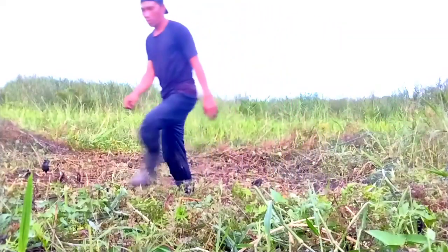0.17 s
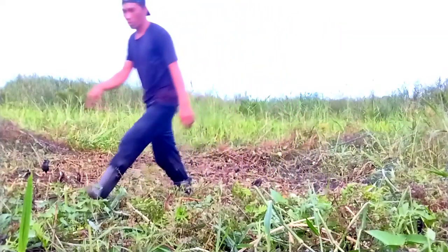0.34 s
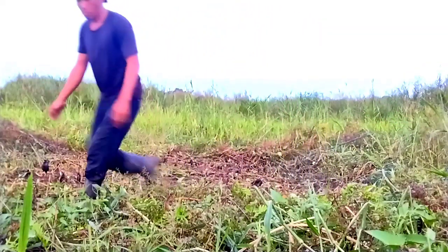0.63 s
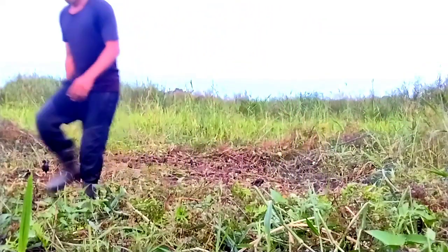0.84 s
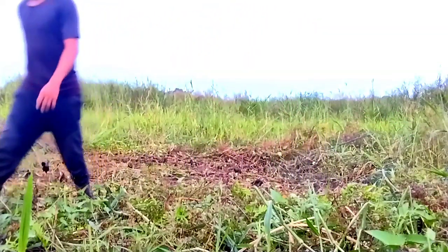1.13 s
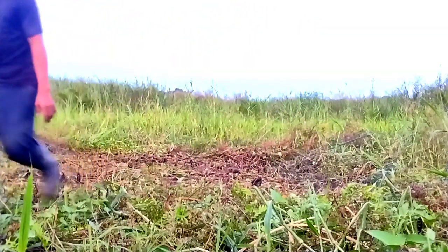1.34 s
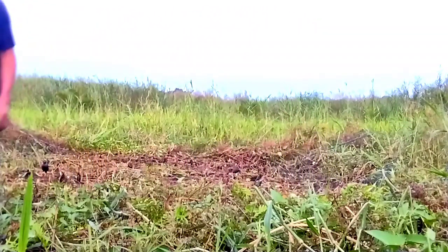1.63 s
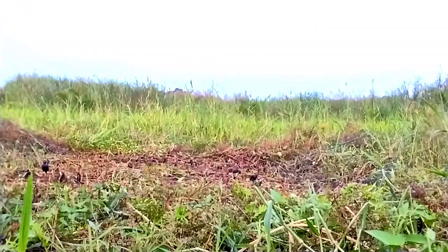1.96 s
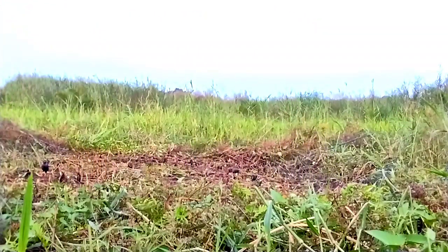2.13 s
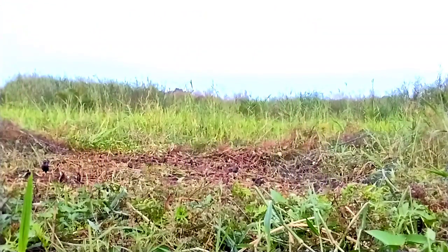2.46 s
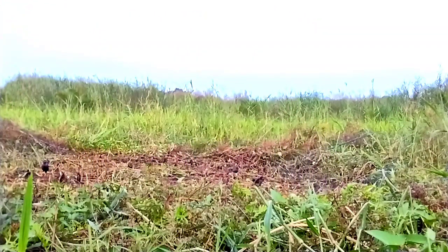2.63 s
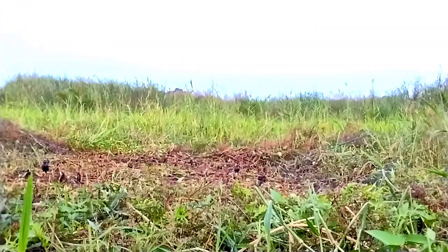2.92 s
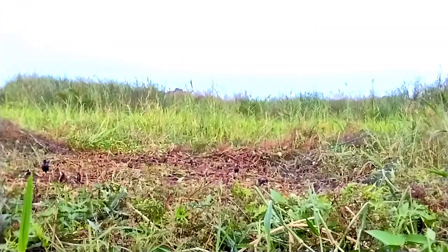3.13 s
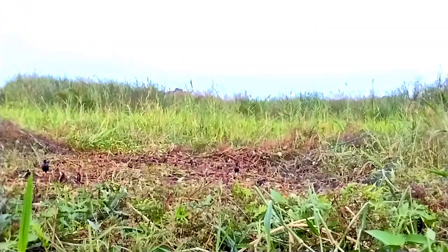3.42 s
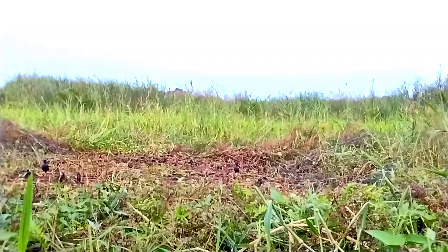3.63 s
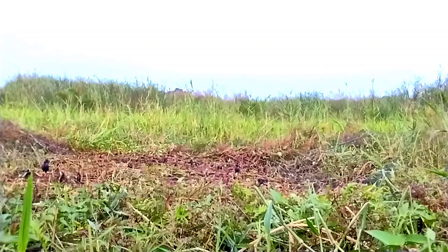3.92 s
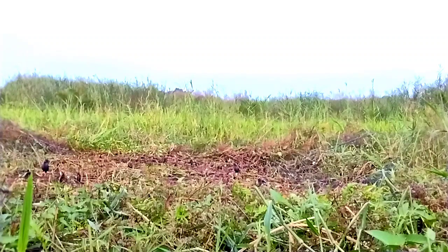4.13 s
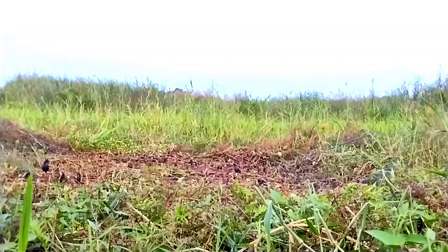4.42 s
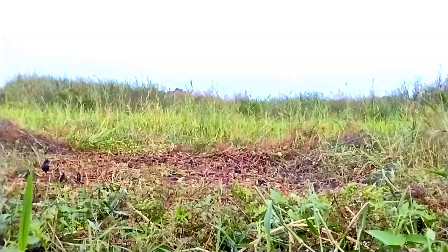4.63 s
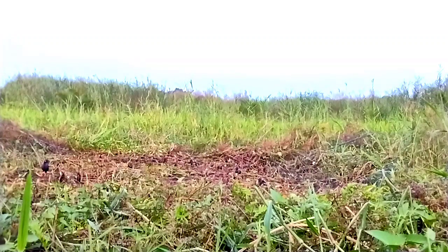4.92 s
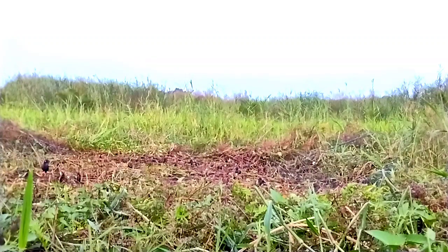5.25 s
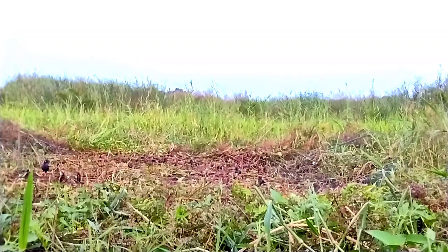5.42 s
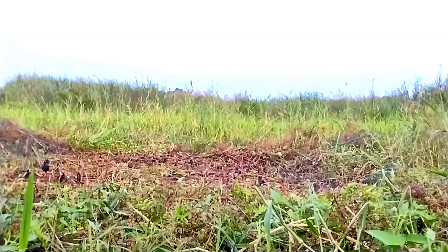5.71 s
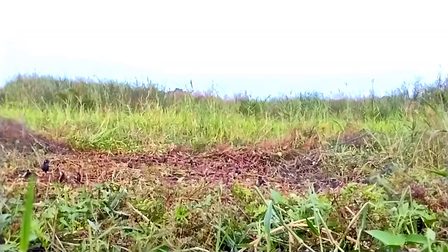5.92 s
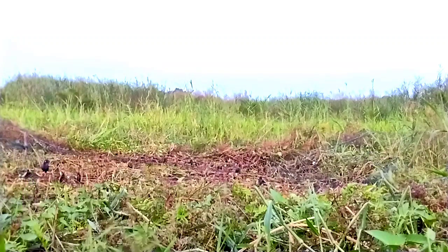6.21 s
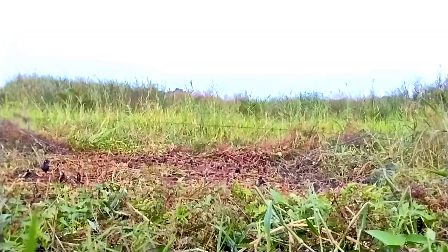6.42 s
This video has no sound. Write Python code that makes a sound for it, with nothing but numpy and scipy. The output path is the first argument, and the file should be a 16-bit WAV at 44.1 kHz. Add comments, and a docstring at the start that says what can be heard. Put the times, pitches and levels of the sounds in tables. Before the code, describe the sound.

An open field with a faint far rumble and a thin steady insect hiss near 8 kHz. From the start small birds chatter in hoarse, overlapping bursts a few times a second, mostly around 3 kHz, with brief clear chirps. Rising whistles that leap to a higher note come at 0, 1.0, 2.8, 4.0, 4.6, 4.75 and 6.1 s; an arched one sweeps up and down at 5.1 s. Thin falling peeps repeat from 4.6 to 5.4 s. Close by, boots squelch and thud softly in mud around 0.4, 1.1 and 1.7 s; a stem snaps sharply at 2.4 s. Wading thickens from 3.6 s, with pops at 4.3 s, dry ticks from 5.35 to 5.8 s, a short rasp at 5.7 s, and the strongest squelch, rustle and cracks at 5.9-6.15 s. Birds carry weak echoes; the small mono microphone suppresses quiet gaps.

```python
"""A grassy field with wet soil: a far rumble, a thin insect hiss near 8 kHz and a flock of small birds.
The birds are gliding near-sines: hoarse overlapping warbles for the chatter, single notes and whistles on top.
Someone wades through weeds nearby: ringing grains squelch, bright grains rustle, noise bursts snap like stems,
damped pops thud, and there are rasps and runs of dry ticks. Weak echoes follow the birds.
A small microphone with a noise suppressor picks it up in mono."""
import sys
import numpy as np
from scipy import signal
from scipy.fft import rfft, irfft
from scipy.io import wavfile
from scipy.ndimage import uniform_filter1d

SR = 44100
rng = np.random.default_rng(int(sys.argv[2]) if len(sys.argv) > 2 else 0)


def unload_audio(sound):
    """Save the sound as a 16-bit wav file, at the path given as the first command line argument."""
    columns = np.transpose(np.atleast_2d(sound))
    # keep every value between -1 and 1, then stretch to whole-number steps
    steps = np.round(np.clip(columns, -1, 1) * 32767)
    wavfile.write(sys.argv[1], SR, steps.astype(np.int16))


N = 290178   # length in samples

# All levels are set ahead of the suppressor and microphone.
# Far rumble and hiss, tone colour: (frequency [Hz], relative level [dB])
FIELD_COLOUR = [(20, -12), (85, -16), (125, 3.5), (250, -2), (500, -13.5), (1500, -25.5), (3000, -19),
                (5000, -29.5), (9500, -40.5), (12000, -43), (15700, -46)]
# Strides through the weeds: (peak time [s], build-up [s], dying time [s],
# squelch level before trim [dB], leaves level before trim [dB])
STRIDES = [(0.375, 0.046, 0.27, -50.5, -67), (.92, 0.03, 0.04, -49.5, -85), (1.086, 0.01, .14, -46.5, -65),
           (1.702, 0.035, 0.17, -51.5, -70), (2.482, .05, 0.039, -67, -64),
           (3.573, 0.011, 0.084, -37.5, -55), (3.64, .05, 0.29, -49, -60.5),
           (3.953, 0.15, 0.048, -69, -55.5), (4.365, 0.21, 0.24, -42.5, -54), (4.812, 0.19, 0.18, -51, -72),
           (4.95, 0.13, .15, -52, -57.5), (5.036, 0.28, 0.13, -47.5, -57.5),
           (5.55, 0.087, 0.11, -49.5, -63), (5.695, 0.014, 0.15, -41, -64), (5.989, 0.23, 0.26, -41, -40.5),
           (6.119, 0.064, 0.11, -31, -43), (6.58, 0.054, .05, -53, -54.5)]
# Faint stirring between strides: (time [s], squelch before trim [dB], leaves before trim [dB])
STIRRING = [(0, -65.5, -76), (1.3, -69, -79), (1.9, -66, -74), (2.6, -64, -75.5), (3.5, -67, -67),
            (5.4, -62, -67), (6.3, -59, -62.5), (6.58, -66.5, -83)]
# Filter laid over the ringing mud grains: (frequency [Hz], relative gain [dB])
SQUELCH_COLOUR = [(40, -62), (80, -42), (200, -5), (350, -0.5), (650, 0.5), (1200, -3), (2200, -5),
                  (5000, -23)]
# Filter laid over the brushing leaf grains: (frequency [Hz], relative gain [dB])
LEAF_COLOUR = [(60, -25), (300, 9), (1500, 11), (3000, 13), (5500, 6.5), (9000, 5.5), (12000, -3.5),
               (15500, 11.5)]
# Breaking stems: (time [s], peak level [dB])
STEM_SNAPS = [(0.3516, -49), (1.0834, -43), (1.2026, -35.5), (1.273, -38), (1.6944, -37), (1.9707, -41.5),
              (2.4436, -10.5), (3.573, -36), (3.687, -36), (3.9498, -32), (4.0894, -39), (4.169, -36),
              (4.263, -33), (4.362, -35), (4.9354, -52), (5.1199, -51), (5.8203, -37), (5.936, -21.5),
              (6.0496, -21), (6.4184, -45)]
# Boots in mud: (time [s], drive level [dB], pitch of the first pop [Hz])
BOOT_THUDS = [(0.362, -36, 453), (0.538, -36.5, 404), (0.912, -41, 990), (1.081, -23, 600),
              (1.684, -37.5, 625), (2.182, -41.5, 404), (3.578, -22.5, 594), (3.663, -37.5, 674),
              (4.262, -32.5, 625), (4.306, -24, 567), (4.364, -29.5, 915), (5.047, -32, 780),
              (5.925, -30, 433), (5.999, -31, 601), (6.126, -20.5, 641)]
# Runs of dry even ticks: (start [s], end [s], period [ms], drive level before the band-pass [dB])
TICK_RUNS = [(5.349, 5.399, 23, -36), (5.464, 5.548, 20.5, -37), (5.715, 5.804, 20.7, -41)]
# A boot drags through coarse stems: (time [s], length [ms], opening level [dB], band centre, roughly [Hz])
BOOT_RASPS = [(3.568, 25, -41.5, 1270), (5.688, 60, -42, 1740)]
# Bursts of rough chatter: (time [s], length [s], opening level [dB], closing level [dB])
CHATTER_BURSTS = [(0.0, 0.051, -45.5, -53), (0.058, 0.16, -49.5, -48.5), (0.327, 0.15, -40, -51),
                  (0.528, 0.19, -50, -51.5), (0.827, 0.2, -49.5, -47.5), (1.013, .19, -48.5, -50),
                  (1.296, 0.1, -48.5, -45), (1.5, 0.14, -58.5, -54), (1.624, 0.21, -49.5, -42.5),
                  (1.93, 0.065, -57.5, -59), (1.98, 0.2, -48.5, -56), (2.164, 0.16, -49.5, -56.5),
                  (2.376, 0.21, -47.5, -51), (2.679, .12, -44.5, -48.5), (2.794, 0.068, -43.5, -50),
                  (2.93, 0.032, -56, -55), (3.063, 0.14, -47, -47), (3.277, 0.21, -44.5, -57.5),
                  (3.474, 0.12, -44.5, -44), (3.65, .17, -43, -50.5), (3.914, 0.23, -46.5, -41.5),
                  (4.153, 0.12, -42.5, -46), (4.328, .155, -47, -48.5), (4.517, .14, -42.5, -53),
                  (4.695, .16, -44, -51.5), (4.899, 0.19, -48.5, -47), (5.104, 0.22, -46, -50),
                  (5.282, 0.13, -46, -48.5), (5.465, 0.16, -46, -49), (5.745, 0.094, -49.5, -48),
                  (5.955, 0.25, -47.5, -37.5), (6.231, 0.1, -41, -50.5), (6.382, 0.083, -50.5, -49),
                  (6.531, .05, -54, -48)]
# Swing of the chatter's register; only its ratio to the mean counts: (time [s], frequency [Hz])
FLOCK_REGISTER = [(0, 3353), (1.2, 2952), (1.3, 3749), (2.1, 3398), (2.8, 2951), (3.7, 3050), (4.0, 3503),
                  (4.48, 3600), (4.56, 2951), (5.6, 3395), (5.75, 2900), (6.05, 3599), (6.58, 3000)]
# Shrill group near 5.5 kHz: (time [s], level against the rest of the chatter [dB])
SHRILL_SHARE = [(0, -15), (.5, -14), (1.0, -10), (1.25, -33), (3.5, -21.5), (5.0, -32), (6.58, -17.5)]
# Overtones of a bird's voice, before each voice's trim and the treble fade: (multiple [x], level [dB])
VOICE_OVERTONES = [(2, -20.5), (3, -21.5), (4, -20)]
# Short clear notes: (time [s], length [ms], start pitch [Hz], end pitch [Hz], level [dB])
CLEAR_NOTES = [(0.077, 37, 3250, 3100, -48), (0.175, 52, 3470, 3870, -45), (0.319, 15, 3920, 3850, -48),
               (0.46, 27, 2480, 3030, -50.5), (0.597, 22, 3680, 3640, -49), (0.709, 39, 2760, 3130, -47),
               (0.74, 33, 2560, 2550, -54), (0.842, 34, 2610, 2600, -49.5), (0.905, 54, 3530, 3720, -50.5),
               (0.959, 20, 3190, 3020, -42), (0.969, 16, 3300, 3630, -39), (0.985, 24, 3060, 2800, -40.5),
               (1.005, 33, 2910, 3590, -40), (1.107, 26, 2680, 2600, -44), (1.21, 27, 3610, 3700, -51.5),
               (1.215, 35, 5300, 5320, -56), (1.285, 20, 4400, 4200, -52), (1.387, 36, 3940, 4030, -40),
               (1.403, 55, 2610, 2580, -51), (1.463, 52.5, 3850, 3560, -43), (1.518, 22, 2950, 2340, -46.5),
               (1.553, 29, 3250, 2160, -48), (1.583, 39, 3925, 3730, -40), (1.671, 23, 3600, 3800, -44),
               (1.783, 39, 3800, 3700, -41), (2.0, 35, 2370, 2800, -52.5), (2.1, 57, 3600, 3420, -54),
               (2.172, 23, 2740, 2910, -43), (2.222, 44, 2820, 3350, -41.5), (2.448, 28, 2710, 2850, -42.5),
               (2.561, 38, 2250, 2900, -52.5), (2.812, 39, 2825, 2650, -46.5), (2.828, 94, 3720, 3550, -45),
               (3.129, 29.4, 2570, 2790, -45), (3.218, 67, 3830, 3700, -56), (3.273, 21.4, 2850, 3100, -41),
               (3.326, 32, 3070, 3240, -45), (3.6, 35, 3550, 3500, -50.5), (3.705, 23, 2800, 2840, -41),
               (3.723, 23, 3310, 3340, -47.5), (3.829, 64, 3590, 3440, -51.5), (3.89, 36, 5200, 5260, -51),
               (4.07, 36, 3950, 3480, -37), (4.124, 56, 3500, 3740, -38), (4.212, 48, 3850, 3730, -44.5),
               (4.25, 46, 2205, 1930, -41), (4.266, 31, 3790, 3810, -37), (4.329, 22, 2650, 2640, -42),
               (4.353, 22, 3520, 3840, -39), (4.379, 17, 3730, 3640, -40), (4.473, 23.5, 3850, 3720, -38.5),
               (4.602, 29, 2430, 2916, -43), (4.7, 72, 1870, 1640, -55), (4.947, 40, 2600, 2900, -42.5),
               (5.003, 61, 3140, 3260, -44.5), (5.044, 25, 3030, 3010, -41), (5.125, 14, 5850, 5100, -54),
               (5.151, 34, 2900, 2800, -44.5), (5.205, 21, 6100, 5100, -60), (5.342, 39, 2840, 3320, -46),
               (5.416, 50, 3230, 3590, -51), (5.578, 50, 3450, 3910, -47), (6.178, 20, 2740, 3080, -42),
               (6.188, 46, 3050, 3790, -36.5), (6.255, 20, 2530, 2570, -43), (6.31, 49, 3710, 3570, -43.5),
               (6.421, 27, 3160, 3210, -43.5)]
# One bird repeats a thin falling note: (time [s], level [dB])
THIN_PEEPS = [(4.601, -56), (4.693, -58), (4.79, -58), (4.888, -56), (4.988, -51.5), (5.107, -49),
              (5.217, -54), (5.32, -53.5), (5.439, -55.5)]
# Rising whistles: (time [s]; lengths of opening, low note, leap, high note [ms];
# pitch at start, dip, low note, its sag, its end, high note [Hz];
# level [dB], opening and high note against it [dB], overtone trim [dB])
RISING_WHISTLES = [(0.005, 34.8, 68, 11, 48, 1847, 1830, 2080, 1900, 2194, 2867, -36.5, -15.5, 3.5, -7.5),
                   (1.025, 54.4, 73.2, 15, 42, 1900, 2050, 2240, 2180, 2370, 2986, -35, -24.5, -2.5, -11),
                   (2.806, 62.4, 62, 22, 29.2, 1618, 1155, 2040, 1830, 2130, 2787, -41, -14.5, -6, 9),
                   (3.996, 55, 49.1, 31, 30, 1837, 1638, 1990, 1980, 2090, 2900, -37.5, -14.5, -5, 0),
                   (4.641, 36.5, 63.9, 29, 41, 1910, 2037, 2300, 2226, 2196, 2910, -33, -19.5, -7.5, -22),
                   (4.745, 25, 54, 20, 44, 1790, 1730, 2030, 2020, 2160, 2806, -35.5, -21, -3.5, -4),
                   (6.110, 40, 47.9, 13, 55, 1890, 1920, 2000, 2040, 2167, 2840, -41.5, -2, 2, 5)]
# One whistle sweeps up and glides down: (time [s], pitch [Hz], level [dB])
ARCHED_WHISTLE = [(5.126, 2690, -48), (5.135, 2512, -44.5), (5.154, 3470, -38.5), (5.171, 3760, -42),
                  (5.193, 3560, -41), (5.228, 2400, -45.5), (5.247, 2310, -58)]
# Reflections off the ground and the bank: (delay [s], level [dB])
ECHO_TAPS = [(.011, -18), (.023, -22), (0.042, -20.5), (.067, -32)]

FIELD_DB = -57.5
INSECT_HZ, INSECT_WIDTH_HZ, INSECT_DB = 8100, 800, -60   # width is that of each of two resonators
STRIDE_RANGE_DB = 17.5   # fall over one build-up or dying time
SNAP_HZ = 4800
THUD_S = 0.037   # span over which the pops of a thud scatter
FLOCK_HZ = 3177
REGISTER_FOLLOWS = 0.6   # share of the register swing, in octaves, that the near birds follow
HOARSE, FAR_SHARE = 0.22, 0.3   # depth of the rattle; far birds against the near ones
BURST_RISE_S, BURST_FALL_S, LULL_DB = 0.026, 0.027, -60.5
NOTE_LINGERS = 0.85   # share of the sweep above its lower end at mid-note: notes dwell high
PEEP_MS, PEEP_START_HZ, PEEP_HZ, PEEP_END_HZ = 52, 4120, 4170, 3800
SLIDE_S = 0.02   # slide into a whistle's low note
CLOSING_SAG = 0.03   # the high note starts and ends this share flat
LOW_DB, LEAP_DB, CLOSING_DB = -7.5, -3, -8   # low note, middle of the leap, fade of the high note
MIC_DIP_HZ, MIC_DIP_WIDTH_HZ, MIC_DIP_SHARE = 6516, 920, 0.68
MIC_LOW_HZ, CUTOFF_HZ = 94, 15800


def amp(db):
    """dB to gain."""
    return 10 ** (np.asarray(db) / 20)


def rms_one(x):
    """Scale to rms 1."""
    return x / np.sqrt(np.mean(x ** 2) + 1e-20)


def in_time(rows):
    """Draw each column of a breakpoint table as a curve over the whole scene."""
    s, *columns = np.transpose(rows)
    return [np.interp(np.arange(N) / SR, s, column) for column in columns]


def drift(rate, size=N):
    """Slow random wandering of spread about 1, with `rate` new targets a second."""
    knots = rng.standard_normal(int(size / SR * rate) + 3)
    return 1.2 * np.interp(np.arange(size) / SR * rate, np.arange(len(knots)), knots)


def coloured(x, spectrum):
    """Filter a signal by a drawn curve, straight in log frequency; rms 1."""
    hz, db = np.transpose(spectrum)
    bins = np.arange(N // 2 + 1) * SR / N + 1
    gain = amp(np.interp(np.log(bins), np.log(hz), db))
    return rms_one(irfft(rfft(x) * gain, N))


def grains(per_s, spread_db, noise):
    """Random clicks of uneven size on a bed of noise."""
    sizes = amp(spread_db * np.minimum(rng.exponential(1, N), 4)) * rng.choice([-1, 1], N)
    clicks = sizes * (rng.random(N) < per_s / SR)
    return rms_one(clicks) + noise * rng.standard_normal(N)


def band(x, low_hz, high_hz):
    """Second-order band-pass."""
    return signal.sosfilt(signal.butter(2, [low_hz, high_hz], "band", fs=SR, output="sos"), x)


def add(out, s, sound):
    """Mix a sound in at a time."""
    at = round(s * SR)
    out[at:at + len(sound)] += sound[:N - at]


def peaks_db(floor_db, shapes):
    """The loudest of several straight-line level shapes (times, dB) over a floor."""
    t, level = np.arange(N) / SR, floor_db + np.zeros(N)
    for s, db in shapes:
        span = slice(*np.searchsorted(t, [s[0], s[-1]]))
        level[span] = np.maximum(level[span], np.interp(t[span], s, db))
    return level


def field():
    """Far rumble and faint hiss: coloured noise whose level wanders."""
    return amp(FIELD_DB + 1.07 * drift(4.74)) * coloured(rng.standard_normal(N), FIELD_COLOUR)


def insects():
    """Many far insects merge into a narrow band of hiss: noise through two equal resonators."""
    radius = np.exp(-np.pi * INSECT_WIDTH_HZ / SR)
    angle = 2 * np.pi * INSECT_HZ / SR
    hiss = rng.standard_normal(N)
    for _ in range(2):
        hiss = signal.lfilter([1, 0, -1], [1, -2 * radius * np.cos(angle), radius ** 2], hiss)
    return amp(INSECT_DB + drift(11)) * rms_one(hiss)


def wading():
    """Mud sucks in low ringing grains, leaves and stems brush in bright ones."""
    levels = []
    for k, stir in enumerate(in_time(STIRRING)):
        shapes = []
        for s, rise, fall, *db in STRIDES:
            times = [s - 2 * rise, s, s + 2 * fall]
            shapes.append((times, db[k] - 2 * STRIDE_RANGE_DB * np.array([1, 0, 1])))
        levels.append(peaks_db(stir, shapes))
    squelch_db, leaves_db = levels
    mud = 0
    for hz in np.geomspace(300, 2400, 10):   # each pocket of wet soil rings a few cycles
        mud = mud + signal.lfilter(*signal.iirpeak(hz, 7.0, fs=SR), grains(90, 3.33, noise=0.39))
    squelch = coloured(mud, SQUELCH_COLOUR) * amp(squelch_db - 0.5 + 2 * drift(70))
    brushing = coloured(grains(1500, 4.7, noise=1.0), LEAF_COLOUR)
    leaves = brushing * amp(leaves_db + 7.5 + 2.7 * drift(30))
    return squelch + leaves


def rasps():
    """Coarse grains that start abruptly and fade by 9 dB."""
    out, grit = np.zeros(N), grains(700, 4.6, noise=1.0)
    for s, ms, db, hz in BOOT_RASPS:
        fade_db = np.linspace(0, -9, round(ms * SR / 1000))
        piece = grit[round(s * SR):][:len(fade_db)]
        scratch = rms_one(band(piece, hz / 1.45, hz * 1.25))
        add(out, s, amp(db + fade_db) * signal.windows.tukey(len(fade_db), 0.04) * scratch)
    return out


def ticks():
    """Each tick is a few milliseconds of decaying noise between about 3 and 6 kHz."""
    out, t = np.zeros(N), np.arange(round(0.004 * SR)) / SR
    for start, end, period_ms, db in TICK_RUNS:
        for s in np.arange(start, end, period_ms / 1000):
            add(out, s, amp(db) * rng.standard_normal(len(t)) * np.exp(-t / 0.0018))
    return band(out, 3000, 5900)


def thuds(count=8):
    """A boot presses into mud: one damped low pop, then weaker ones as the mud lets go."""
    out, t = np.zeros(N), np.arange(round(0.03 * SR)) / SR
    envelope = t / 0.0019 * np.exp(1 - t / 0.0013)
    for s, db, hz in BOOT_THUDS:
        for k, (late, pitch, size) in enumerate(rng.random((count, 3))):
            if k == 0:   # the first pop is on time, on pitch and at full level
                late, pitch, size = 0, 0.5, 0
            pop_hz = hz * 2 ** (0.8 * (pitch - 0.5))
            pop = np.sin(2 * np.pi * pop_hz * t) * envelope
            add(out, s + (k + late) / count * THUD_S, amp(db - 2.3 * k - 20.0 * size) * pop)
    return band(out, 270, 4500)


def snaps():
    """A stem breaks: a burst of noise that dies in a few ms, with a short weak tail."""
    out, t = np.zeros(N), np.arange(round(0.05 * SR)) / SR
    decay = np.exp(-t / 0.00096) + 0.25 * np.exp(-t / 0.0067)
    for s, db in STEM_SNAPS:
        burst = rng.standard_normal(len(t)) * decay
        burst = band(burst, SNAP_HZ / 2, 2.01 * SNAP_HZ) + 0.55 * band(burst, 270, 0.45 * SR)
        add(out, s, amp(db) * burst / np.max(np.abs(burst)))
    return out


def syrinx(pitch, overtone_db):
    """A bird's voice: a sine of rms 1 plus overtones that fade towards the treble."""
    phase = 2 * np.pi * np.cumsum(pitch) / SR
    voice = np.sin(phase)
    for multiple, db in VOICE_OVERTONES:
        treble_fade = 1 + (multiple * pitch / 8000) ** 6
        voice = voice + amp(db + overtone_db) / treble_fade * np.sin(round(multiple) * phase)
    return np.sqrt(2) * voice


def warblers(centre_hz, count):
    """Several hoarse birds at once, each warbling in steep arches of about 10 ms, broken into syllables."""
    flock = 0
    for register in np.linspace(-0.25, 0.32, count):   # octaves from the centre
        octaves = register + 0.08 * drift(18) + 0.17 * uniform_filter1d(drift(150), size=130)
        octaves = 0.6 * np.tanh(octaves / 0.6)   # soft limit on the range
        syllables = amp(9 * np.clip(drift(80), -3, 1.2))
        rattle = 1 + HOARSE * drift(450)   # uneven vibration smears the tone
        voice = syrinx(centre_hz * 2 ** octaves, overtone_db=1.5)
        flock = flock + amp(-14 * register) * syllables * rattle * voice   # higher birds are softer
    return rms_one(flock)


def chatter():
    """The near warblers, a shrill group above them and far birds, swelling together."""
    register, = in_time(FLOCK_REGISTER)
    centre_hz = FLOCK_HZ * (register / register.mean()) ** REGISTER_FOLLOWS
    flock = band(warblers(centre_hz, count=6), 2530, 5080)
    # the flock as a whole keeps its level
    evened = flock / np.sqrt(uniform_filter1d(flock ** 2, size=2000) + 1.4)
    far = rms_one(band(rng.standard_normal(N), 2370, 4100))   # far birds blur into a rasp
    shrill = amp(in_time(SHRILL_SHARE)[0]) * band(warblers(5400, count=3), 4150, 8100)
    bursts = []
    for s, length, opening, closing in CHATTER_BURSTS:
        times = [s, s + BURST_RISE_S, s + length, s + length + BURST_FALL_S]
        bursts.append((times, [LULL_DB, opening, closing, LULL_DB]))
    birds = rms_one(rms_one(evened) + FAR_SHARE * far) + shrill
    return amp(peaks_db(LULL_DB, bursts)) * birds


def note(ms, start, middle, end, waver, overtone_db):
    """One short note: the pitch bends along a parabola through three points and wavers."""
    u = np.linspace(0, 1, max(round(ms * SR / 1000), 8))
    pitch = start * (1 - u) * (1 - 2 * u) + 4 * middle * u * (1 - u) + end * u * (2 * u - 1)
    pitch = pitch * (1 + waver * drift(141, size=len(u)))
    tremble = 1 + 0.32 * drift(187, size=len(u))
    return tremble * signal.windows.tukey(len(u), 0.7) * syrinx(pitch, overtone_db)


def notes():
    """The notes that stand out of the chatter: bent clear notes and thin falling peeps."""
    out = np.zeros(N)
    for s, ms, start, end, db in CLEAR_NOTES:
        middle = min(start, end) + NOTE_LINGERS * abs(end - start)
        add(out, s, amp(db) * note(ms, start, middle, end, waver=0.0084, overtone_db=-2.5))
    for s, db in THIN_PEEPS:
        peep = note(PEEP_MS, PEEP_START_HZ, PEEP_HZ, PEEP_END_HZ, waver=0.0043, overtone_db=-10)
        add(out, s, amp(db) * peep)
    return out


def whistle(s, hz, db, overtone_db):
    """A glide through points of pitch and level, pitch corners rounded; returns its start and sound."""
    t = np.arange(s[0], s[-1], 1 / SR)
    pitch = uniform_filter1d(np.interp(t, s, hz), size=250, mode="nearest")
    level = amp(np.interp(t, s, db)) * signal.windows.tukey(len(t), 0.06)
    return t[0], level * syrinx(pitch, overtone_db)


def whistles():
    """An opening that glides to the low note, a sag and lift, a leap, and a high note that droops."""
    out = np.zeros(N)
    for start, *row in RISING_WHISTLES:
        settle, before, after, end = start + np.cumsum(row[:4]) / 1000   # before and after the leap
        opening, dip, low, sag, lifted, high, db, opening_db, high_db, overtone_db = row[4:]
        s = [start, settle - SLIDE_S, settle, (settle + before) / 2, before,
             (before + after) / 2, after, (after + end) / 2, end]
        drooped = high * (1 - CLOSING_SAG)
        hz = [opening, dip, low, sag, lifted, (lifted + drooped) / 2, drooped, high, drooped]
        level = [opening_db, opening_db, LOW_DB, LOW_DB, 0, LEAP_DB, high_db, high_db, high_db + CLOSING_DB]
        add(out, *whistle(s, hz, db + np.array(level), overtone_db))
    add(out, *whistle(*np.transpose(ARCHED_WHISTLE), overtone_db=-14))
    return out


def outdoors(x):
    """Add a few weak, delayed copies as echoes."""
    out = x.copy()
    for s, db in ECHO_TAPS:
        add(out, s, amp(db) * x)
    return out


def suppressor(x, knee_db=-55, depth_db=8):
    """When the mid band falls quiet, all above the bass is turned down."""
    power = uniform_filter1d(band(x, 1160, 5000) ** 2, size=900)
    quiet = np.clip((knee_db - 10 * np.log10(power + 1e-12)) / 5.7, 0, 1)
    bass = signal.sosfiltfilt(signal.butter(2, 300, fs=SR, output="sos"), x)
    return bass + (x - bass) * amp(-depth_db * uniform_filter1d(quiet, size=600))


def scene():
    """Field and insects, the wader, and the birds with their echoes, as one channel."""
    background = field() + insects()
    wader = wading() + rasps() + ticks() + thuds() + snaps()
    birds = outdoors(chatter() + notes() + whistles())
    return (background + wader + birds)[None]


def record(dry):
    """The microphone dips below the insect band and thins the deep bass; suppressor, then a steep top cut."""
    dip = signal.lfilter(*signal.iirpeak(MIC_DIP_HZ, MIC_DIP_HZ / MIC_DIP_WIDTH_HZ, fs=SR), dry)
    low_cut = signal.butter(1, MIC_LOW_HZ, "high", fs=SR, output="sos")
    heard = signal.sosfilt(low_cut, dry - MIC_DIP_SHARE * dip)
    top_cut = signal.cheby2(16, 60, CUTOFF_HZ, fs=SR, output="sos")
    return signal.sosfilt(top_cut, suppressor(heard))


dry = scene()
out = record(dry)
unload_audio(out)
```